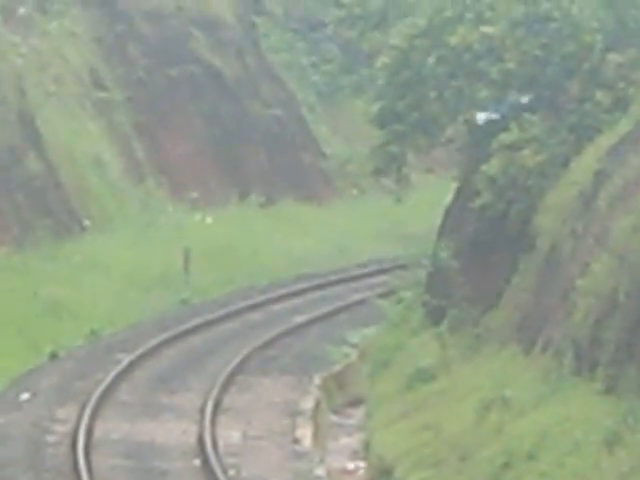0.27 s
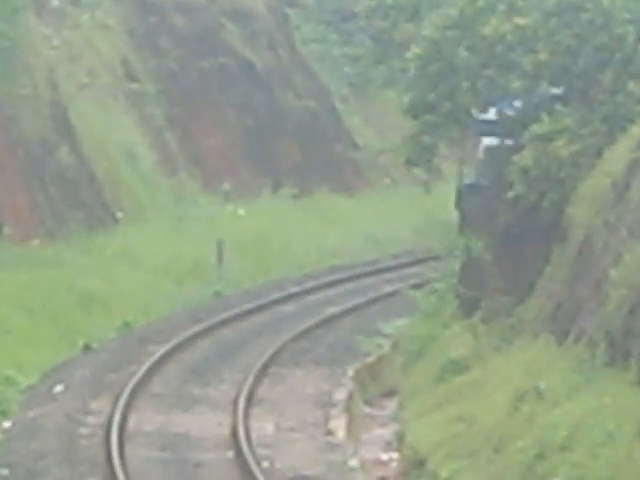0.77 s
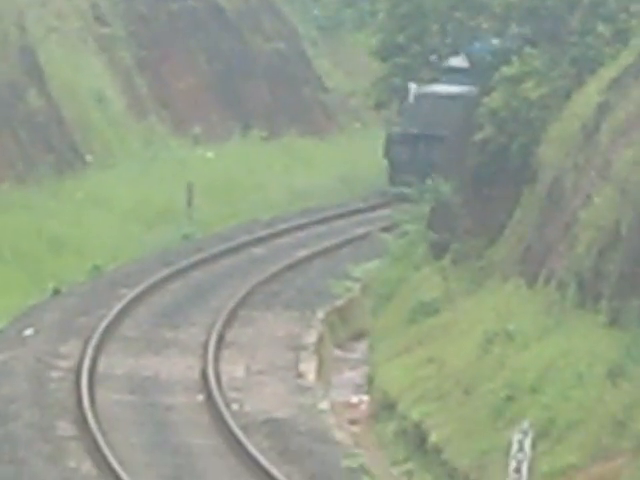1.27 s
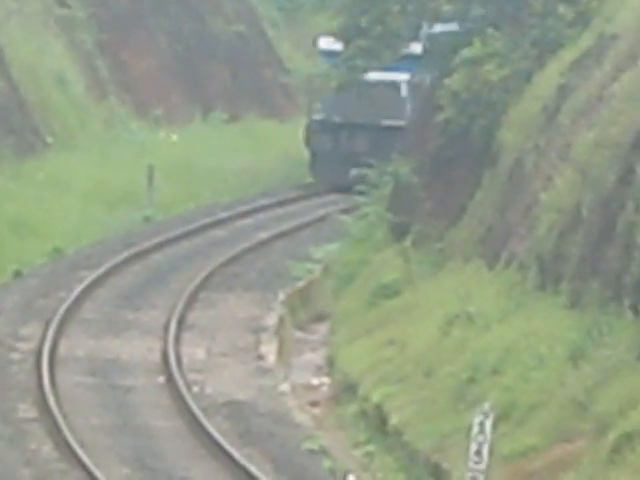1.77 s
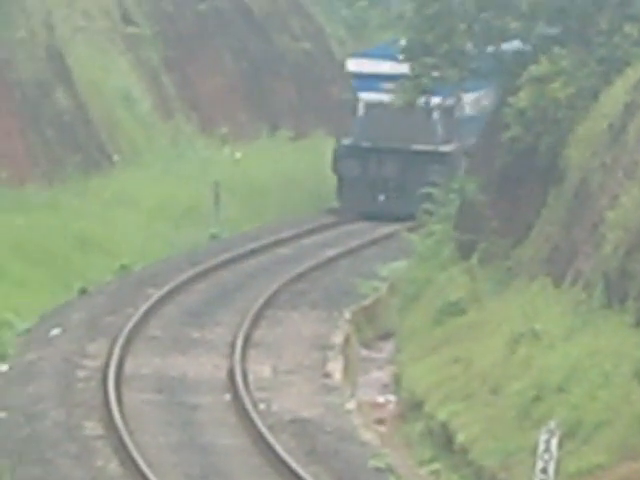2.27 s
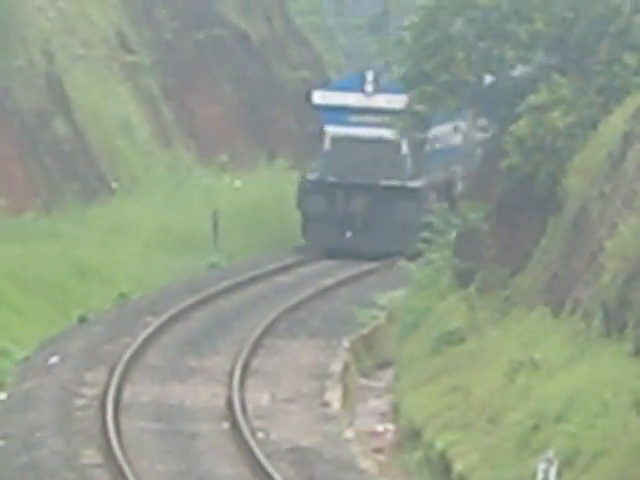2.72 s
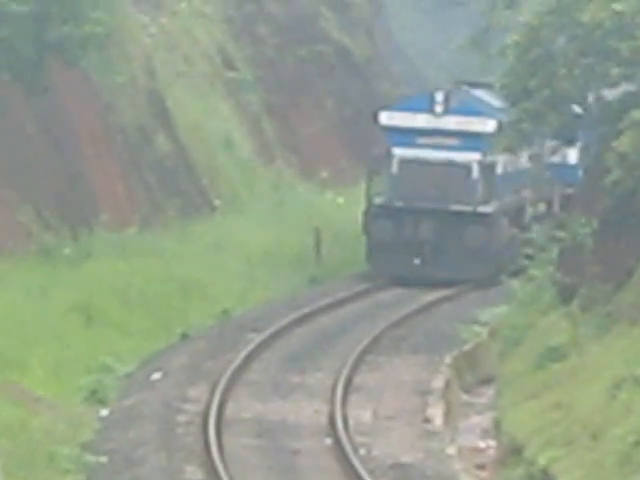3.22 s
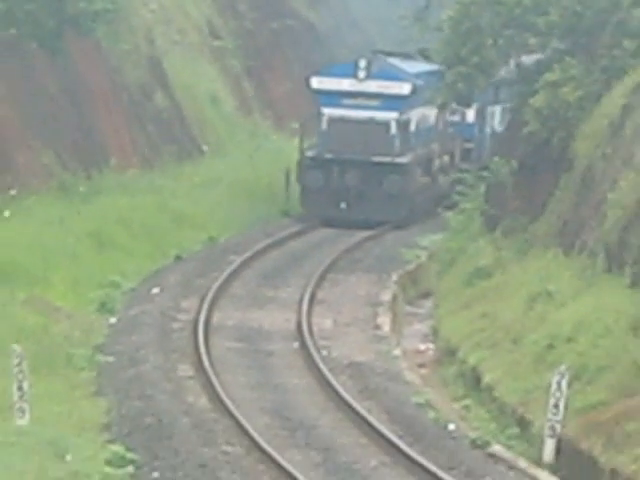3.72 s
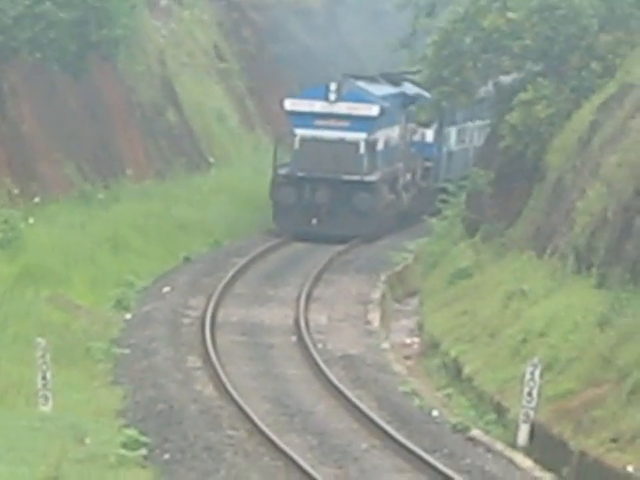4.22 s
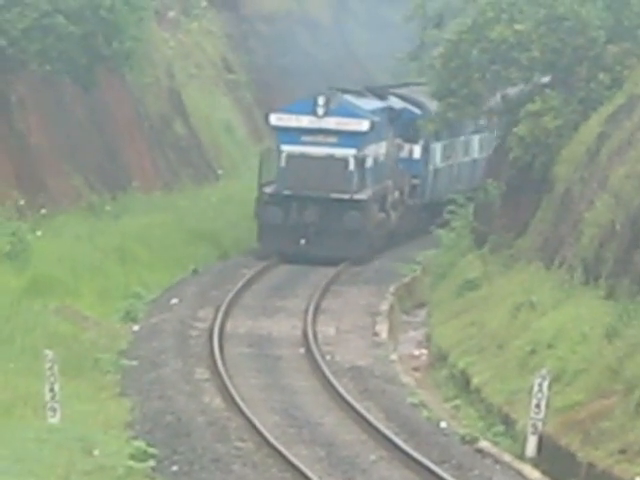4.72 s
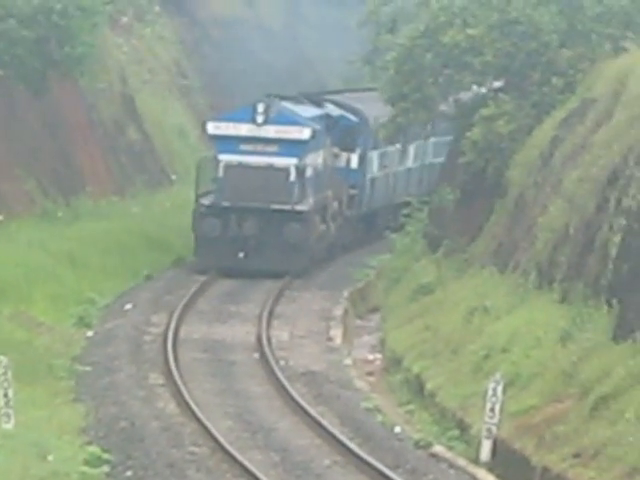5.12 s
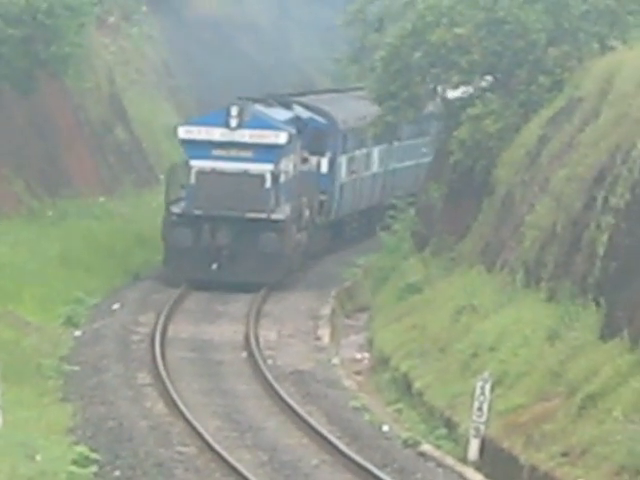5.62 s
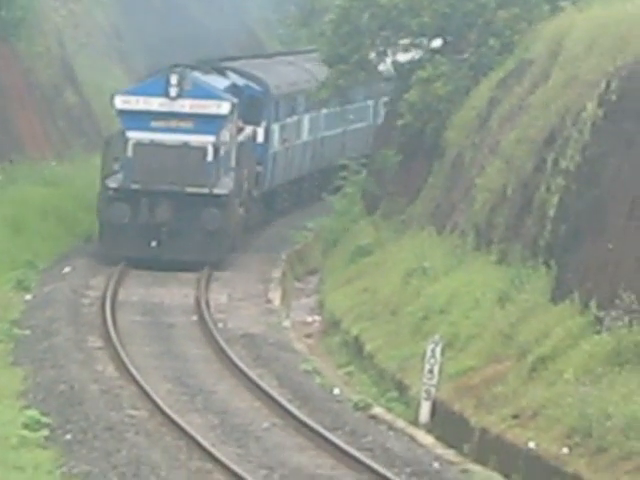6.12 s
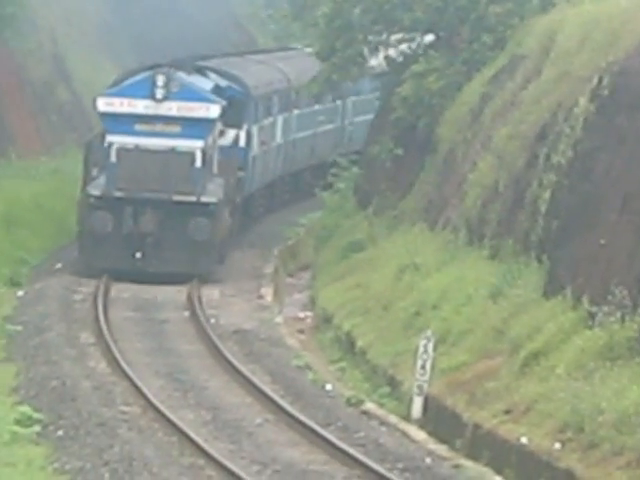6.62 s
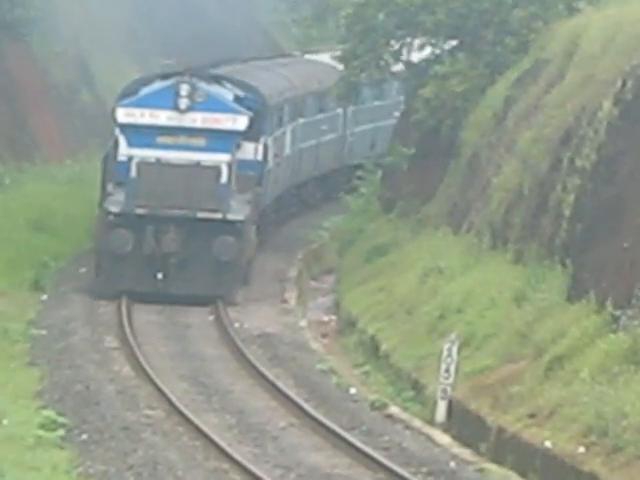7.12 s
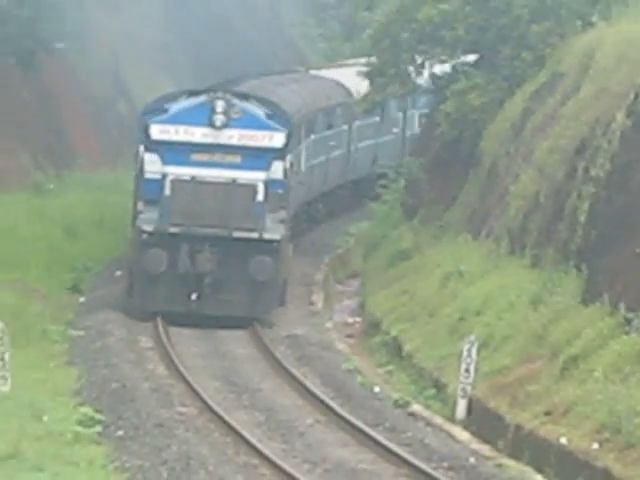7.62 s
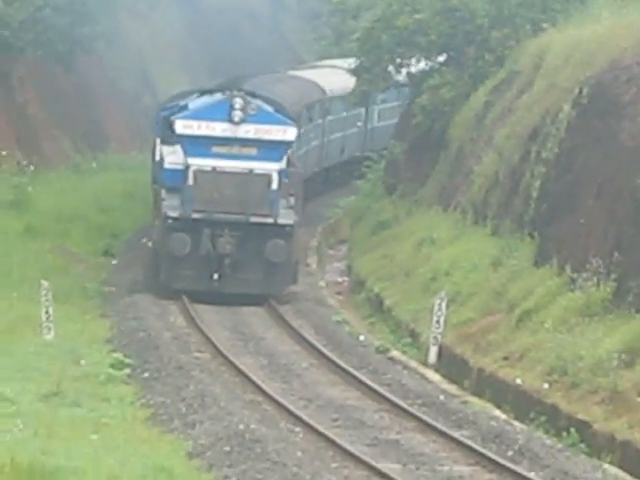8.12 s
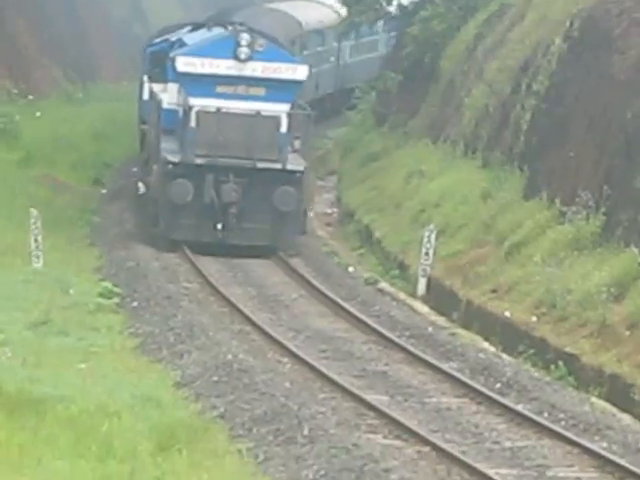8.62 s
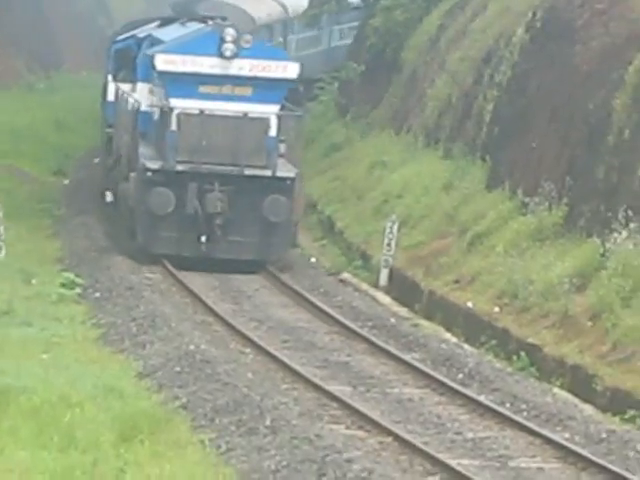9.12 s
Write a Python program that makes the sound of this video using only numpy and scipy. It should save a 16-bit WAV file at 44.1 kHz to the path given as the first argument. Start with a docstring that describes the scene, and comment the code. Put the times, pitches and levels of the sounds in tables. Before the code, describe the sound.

A small camera's microphone hears an approaching train: a deep continuous engine hum, broad roar, rushing wheels and thin fan and gear whines. A soft puff and tiny clink come early, faint whistles and short squeals around three seconds. Dry clicks near the middle and later briefly dip everything. The engine chugs more clearly in the open, then rough wind bursts cover the ending.

```python
"""Railway cutting: a two-stroke diesel locomotive draws a train toward a small camera.
Exhaust drone is lines at multiples of the crank rate; roar, rush and hiss are shaped noise;
fan, gears and traction whine as tones. A puff, a clink, thin whistles, short squeals and a late hiss pass.
Sharp ticks on the camera body make the gain control duck and creep back; late gusts buffet the microphone.
"""
import sys
import numpy as np
from scipy import signal
from scipy.fft import rfft, irfft, next_fast_len
from scipy.io import wavfile

SR = 44100
rng = np.random.default_rng(int(sys.argv[2]) if len(sys.argv) > 2 else 0)


def generate_wav(signal):
    """Clip the signal to [-1, 1] and save it as 16-bit WAV at the path in sys.argv[1]."""
    frames = np.transpose(np.atleast_2d(signal))
    scaled = np.clip(frames, -1, 1) * 32767
    pcm = np.round(scaled).astype(np.int16)
    wavfile.write(sys.argv[1], SR, pcm)


N = 413658
T = np.arange(N) / SR

# Level columns marked * : behind the bank/dB, in the open/dB, head-on/dB, all at START_M
START_M, SPEED_M_PER_S = 350, 10.15
# locomotive comes out from behind the bank: from/s, to/s
CLEARS_BANK_S = (2.9, 5.24)
# locomotive turns its nose to us: from/s, to/s
TURNS_HEAD_ON_S = (7.1, 7.97)

CRANK_HZ, FIRINGS_PER_TURN = 16.16, 8
# firing tone: *
FIRING_DB = (-28, -34, -34)
# echoes off the cutting reinforce or cancel the firing tone: t/s, half-length/s, level/dB
FIRING_SWELLS = [(0.65, 0.19, -5), (3.8, 0.33, -10.5), (4.2, 0.21, 2.5), (6.05, 0.18, 6), (6.53, 0.16, -11),
                 (7.03, 0.4, 8)]
# throb, added to the exhaust line levels: *
THROB_DB = (-1, 0.5, -2.5)
# exhaust lines: multiple of crank rate, then level/dB at each of STAGES_S
EXHAUST_LINES = [(2, -65.5, -49, -53, -65), (3, -45.5, -47, -50, -65), (4, -52, -58, -41.5, -60.5),
                 (5, -42.5, -38.5, -38, -44), (6, -59, -35, -47, -50.5), (7, -59.5, -36.5, -36.5, -37),
                 (9, -41, -38.5, -36, -40), (10, -40, -36.5, -35.5, -40), (11, -48, -56.5, -46, -50),
                 (12, -50, -44, -52, -60.5), (13, -49.5, -44.5, -48.5, -59), (14, -61.5, -67, -54, -62.5),
                 (15, -54.5, -65, -62, -73)]
# when the four line levels hold: t/s
STAGES_S = (3.499, 4.4, 6.2, 7.45)
# throb runs sharp, rolling against the firing tone: t/s, half-length/s, crank-rate shift/Hz
THROB_SHARPENING = [(4.85, .5, .282)]
# spread of the puffs: behind the bank/dB, in the open/dB
UNEVEN_PUFFS_DB = (1.1, 1.8)
# chugs that stand out or drop back: t/s, half-length/s, level/dB
CHUG_ACCENTS = [(3.045, .025, 4), (4.152, 0.027, 2.5), (4.41, .09, 1), (5.201, 0.026, 6),
                (5.324, .025, 3.5), (6.182, .025, -2), (6.726, .025, 5.5)]
# gas roar in the stack: *
GAS_DB = (-37.5, -39.5, -37)
# gas ringing in the stack: f/Hz, half-width/Hz, relative level/dB
STACK_MODE = (123, 17, 0)
# depth of gas pulsing: behind the bank, in the open [ratio]
GAS_PULSING = (.15, .45)

# rumble: *
RUMBLE_DB = (-34.5, -34.5, -34)
# rumble colour: f/Hz, relative level/dB per Hz
RUMBLE_COLOUR = [(15, -19.5), (24, -15), (35, 5.5), (50, 10), (95, 9), (125, 7), (155, 6), (175, -5.5),
                 (280, 1.5), (340, -3), (420, -1), (500, -10.5), (900, -7.5), (2000, -33.5)]
# rumble rises and sinks: t/s, half-length/s, level/dB
RUMBLE_SWELLS = [(1.55, .35, -0.5), (2.95, 0.41, 1), (6.95, 0.25, -1)]
# engine hood roar: *
HOOD_DB = (-37.5, -35.5, -36.5)
# engine hood resonances: f/Hz, half-width/Hz, relative level/dB
HOOD_MODES = [(580, 51, -8), (685, 50, -5), (747, 32, -1), (825, 43, 1.5), (877, 58, -4.5)]
# hood roar surges and dips: t/s, half-length/s, level/dB
HOOD_SURGES = [(1.15, 0.2, 3.5), (3.7, .25, -5), (4.6, .15, 0), (4.97, 0.13, 4.5), (6.65, 0.078, 2.5),
               (7.85, 0.24, 3), (8.45, .2, 1.5)]
# radiator roar: *
RADIATOR_DB = (-49.5, -42.5, -45)
# radiator resonances: f/Hz, half-width/Hz, relative level/dB
RADIATOR_MODES = [(1158, 57, -2), (1240, 91, 2), (1385, 30, -4)]
# radiator swells just before the nose hides it: t/s, half-length/s, level/dB
RADIATOR_SWELLS = [(6.8, 0.66, 3.5)]
# wheel rush: *
RUSH_DB = (-34, -32, -34.5)
# wheel rush colour: f/Hz, relative level/dB per Hz
RUSH_COLOUR = [(400, -13), (700, -3), (1050, -2.5), (1380, -1), (1580, -4.5), (1820, 1), (2060, -3.5),
               (2400, 1.5), (2900, -1.5), (3250, -4), (3500, -3.5), (3800, -6), (5000, -19.5),
               (7000, -42.5)]
# high hiss: *
HISS_DB = (-42.5, -38.5, -37)
# hiss colour: f/Hz, relative level/dB per Hz
HISS_COLOUR = [(2000, -25), (3300, -13.5), (4000, -2), (4800, -1), (5300, -5), (6100, -11), (6600, -20.5),
               (7200, -28)]
# treble rises early, dips twice later: t/s, half-length/s, level/dB
TREBLE_SWELLS = [(0.9, 0.24, 2.5), (1.65, 0.6, 3.5), (3.78, 0.18, -4.5), (6.35, 0.47, -0.5)]
RUSH_SHARE = 0.97   # part of the treble swells/dB that the rush follows

# cooling-fan pitch: t/s, f/Hz
FAN_PITCH = [(0, 294.7), (3.3, 294.7), (4.9, 297.9), (7.2, 295.9), (8.4, 294)]
# blade harmonics: multiple, *
BLADE_LINES = [(1, -46.5, -48.5, -51), (2, -49.5, -48.5, -56), (3, -47.5, -44.5, -43.5)]
# one blade harmonic sings out: multiple, t/s, half-length/s, level/dB
FAN_SWELLS = [(2, 5.8, 0.43, 8.5), (3, 1, 0.28, 7), (3, 4.1, 0.2, 4.5), (3, 5.0, 0.13, 10.5),
              (3, 4.9, 0.14, 7.5), (3, 8.5, .16, 2)]
# steady gear-train whines: f/Hz, *
GEAR_TRAIN = [(692, -52.5, -51.5, -61.5), (766, -46.5, -52, -49.5), (833, -48, -50.5, -47),
              (1192, -55.5, -54, -54.5), (1245, -61, -54.5, -53), (1292, -53, -48, -48)]
# one gear whine swells: nearby f/Hz, t/s, half-length/s, level/dB
GEAR_SWELLS = [(762, 0.47, .2, 5), (762, 4.0, .17, 17), (762, 5.4, .09, 13), (762, 7.9, .12, 7),
               (827, 6.1, 0.1, 7), (827, 5.72, .09, 10), (1274, 6.7, .4, 5.5)]
# traction gears: *
TRACTION_DB = (-50.5, -46, -53.5)
TRACTION_START_HZ, TRACTION_RISE_HZ_PER_S = 404.7, 3.2
# thin turbocharger whistles: f/Hz, half-width/Hz, level behind the bank/dB
TURBO_WHISTLES = [(3077, 4, -51), (3020, 13, -56.5), (3457, 47, -49.5), (3610, 30, -54.5)]

# soft early puff of air: t/s, half-length/s, level/dB, f/Hz, half-width/Hz
PUFFS = [(0.622, 0.065, -28, 48.6, 22.3)]
CLINK_S = 0.905
# modes of the clinking steel: f/Hz, level/dB, decay/s
CLINK_MODES = [(4400, -32.5, 0.0072), (4720, -30, .013), (6300, -44, .008)]
# thin high whistles (first three rows), two short squeals, one late broad swell of hiss:
# t/s, half-length/s, level/dB, f/Hz, half-width/Hz
HIGH_SWELLS = [(2.5, 0.36, -48.5, 3112, 8), (2.68, .26, -47, 3622, 7.5), (2.65, .3, -56, 3784, 9),
               (3.08, 0.05, -37.5, 3110, 64), (3.39, .03, -36, 3200, 129), (8.2, .55, -40.5, 3230, 350)]
# ticks on the camera body: t/s, ring level/dB, ring f/Hz, ring decay/s,
# knock level/dB, knock f/Hz, knock decay/s, snap level/dB
TICKS = [(3.323, -11.5, 4240, 0.0022, -8, 750, .001, 4.5),
         (3.6084, -22.5, 3680, 0.0012, -24, 450, .006, -30), (3.609, -19, 5370, 0.0012, -26, 780, .002, -7),
         (3.611, -25, 4500, 0.0009, -18.5, 1000, .0025, -30),
         (7.5177, -17.5, 4050, 0.0019, -23, 750, .001, 3), (7.958, -20, 2490, .001, -25, 750, .001, -9.5)]

# gusts on the microphone: start t/s, length/s, force/dB
GUSTS = [(8.517, 0.024, -28), (8.652, 0.019, -29), (8.685, 0.031, -20), (8.744, 0.042, -16),
         (8.81, .02, -23.5), (8.857, 0.037, -20.5), (8.937, 0.046, -21.5), (8.996, 0.16, -24.5),
         (9.168, .075, -18.5), (9.247, 0.05, -15.5), (9.31, .07, -27)]
GUST_ATTACK_S, GUST_RELEASE_S = 0.011, 0.016
# breeze carrying the gusts: t/s, half-length/s, force/dB
BREEZE = (8.92, 0.25, -26.5)
# buffeting colour: f/Hz, relative level/dB per Hz
BUFFET_COLOUR = [(25, -32.5), (70, 3.5), (150, 1), (230, 1), (320, -4.5), (500, -10.5), (800, -12.5),
                 (1200, -16), (2000, -43.5), (4000, -41)]
# air tearing at the port: f/Hz, half-width/Hz, relative level/dB
TEARING_MODES = [(420, 130, 3.5), (900, 390, -10.5)]
TEARING_DB = 10.5   # on top of force squared
# biggest eddies thump the diaphragm: t/s, peak level/dB
THUMPS = [(8.690, -6.5), (8.703, -6), (8.736, -8), (8.760, -7), (8.872, -13), (9.112, -12), (9.186, -9),
          (9.262, -8), (9.297, -12.5)]
THUMP_S = 0.0013

STOPBAND_HZ = 7550


def from_db(db):
    """Decibels to gain."""
    return 10 ** (np.asarray(db) / 20)


def rms_one(x):
    """Scale to unit power."""
    return x / np.sqrt(np.mean(x ** 2) + 1e-20)


def drift(rate_hz):
    """Slow random wander of spread 1, changing about rate_hz times a second."""
    step = 100   # samples between drawn points
    r = np.exp(-2 * np.pi * rate_hz * step / SR)
    white = rng.standard_normal(N // step + 2002)
    slow = signal.lfilter([1], [1, -2 * r, r * r], white)[2000:]   # drop the settling
    return np.interp(np.arange(N) / step, np.arange(len(slow)), rms_one(slow))


def noise(gain_at):
    """Unit-power noise whose gain is a function of frequency."""
    size = next_fast_len(N)
    hz = np.maximum(np.fft.rfftfreq(size, 1 / SR), 1)
    spectrum = rfft(rng.standard_normal(size)) * gain_at(hz)
    return rms_one(irfft(spectrum, size)[:N])


def coloured(points):
    """Unit-power noise: colour interpolated over log frequency, rolled off around its last point."""
    hz, db = np.transpose(points)

    def gain_at(f):
        return from_db(np.interp(np.log(f), np.log(hz), db)) / (1 + (f / hz[-1]) ** 4)
    return noise(gain_at)


def resonant(modes):
    """Unit-power noise in resonances whose powers add; gain halves at half_width_hz off centre."""
    def gain_at(f):
        power = 0
        for hz, half_width_hz, db in modes:
            power = power + (from_db(db) / (1 + ((f - hz) / half_width_hz) ** 2)) ** 2
        return np.sqrt(power)
    return noise(gain_at)


def tone(turns):
    """Unit-power sinusoid."""
    return np.sqrt(2) * np.cos(2 * np.pi * turns)


def scattered(turns, scatter, rate_hz):
    """Tone joined by its shifting echoes from the cutting walls."""
    in_phase = drift(rate_hz) * np.cos(2 * np.pi * turns)
    quadrature = drift(rate_hz) * np.sin(2 * np.pi * turns)
    return (tone(turns) + scatter * (in_phase + quadrature)) / np.sqrt(1 + scatter ** 2)


def bell(middle_s, half_s):
    """Gaussian rise and fall, 1/e at half_s from the middle."""
    return np.exp(-((T - middle_s) / half_s) ** 2)


def bumps(rows):
    """Sum of smooth passing rises and dips, in the unit of the last column."""
    return sum(height * bell(s, half_s) for s, half_s, height in rows)


def swells(rows):
    """Brief swells of noise, each in one resonance."""
    out = 0
    for s, half_s, db, hz, half_width_hz in rows:
        out = out + from_db(db) * bell(s, half_s) * resonant([(hz, half_width_hz, 0)])
    return out


def approach(levels_db):
    """Source level/dB: interpolated between aspects, growing as 1 / distance."""
    hidden_db, open_db, head_on_db = levels_db
    times_s = [*CLEARS_BANK_S, *TURNS_HEAD_ON_S]
    aspect_db = np.interp(T, times_s, [hidden_db, open_db, open_db, head_on_db])
    return aspect_db - 20 * np.log10(1 - SPEED_M_PER_S * T / START_M)


def exhaust_throb(beat, stack_hz=125, stack_width_hz=55, smear_turns=0.095):
    """Uneven puffing once a turn: lines delayed by stack resonance, smeared by reflections."""
    throb = 0
    for order, *levels_db in EXHAUST_LINES:
        stack_lag = np.arctan(2 * (order * CRANK_HZ - stack_hz) / stack_width_hz) / (2 * np.pi)
        lag_turns = stack_lag + smear_turns * drift(0.3)
        line = scattered(order * beat - lag_turns, scatter=0.44, rate_hz=0.82)
        throb = throb + from_db(np.interp(T, STAGES_S, levels_db)) * line
    puffs_db = np.interp(T, CLEARS_BANK_S, UNEVEN_PUFFS_DB) * drift(10) + bumps(CHUG_ACCENTS)
    return from_db(approach(THROB_DB) + puffs_db) * throb


def exhaust(crank):
    """Firing tone and throb; gas roars in the stack, pulsing once a turn."""
    beat = crank + np.cumsum(bumps(THROB_SHARPENING)) / SR
    firing = scattered(FIRINGS_PER_TURN * crank, scatter=0.15, rate_hz=3.2)
    firing = from_db(approach(FIRING_DB) + bumps(FIRING_SWELLS)) * firing
    pulsing = 1 + np.interp(T, CLEARS_BANK_S, GAS_PULSING) * np.cos(2 * np.pi * beat)
    gas = from_db(approach(GAS_DB)) * pulsing * resonant([STACK_MODE])
    return firing + exhaust_throb(beat) + gas


def rumble():
    """Low coloured noise with a wandering level."""
    level_db = approach(RUMBLE_DB) + bumps(RUMBLE_SWELLS) + 0.9 * drift(3.1)
    return from_db(level_db) * coloured(RUMBLE_COLOUR)


def hood_roar(crank):
    """Noise in the hood resonances, pulsing with the firings and each turn."""
    pulsing = 1 + 0.069 * tone(FIRINGS_PER_TURN * crank) + 0.025 * tone(crank)
    level_db = approach(HOOD_DB) + bumps(HOOD_SURGES) + 0.56 * drift(14.0)
    return from_db(level_db) * resonant(HOOD_MODES) * pulsing


def radiator_roar():
    """Fluttering noise in the radiator resonances."""
    level_db = approach(RADIATOR_DB) + bumps(RADIATOR_SWELLS) + 2.1 * drift(18.0)
    return from_db(level_db) * resonant(RADIATOR_MODES)


def rush_and_hiss():
    """Wheel rush and high hiss: coloured noises sharing treble swells and flutter."""
    air_db = 0.45 * drift(6.2)   # turbulent air makes distant sound flutter
    treble_db = bumps(TREBLE_SWELLS)
    rush_db = approach(RUSH_DB) + RUSH_SHARE * treble_db + air_db
    hiss_db = approach(HISS_DB) + treble_db + air_db + 0.9 * drift(36.0)
    return from_db(rush_db) * coloured(RUSH_COLOUR) + from_db(hiss_db) * coloured(HISS_COLOUR)


def cooling_fan():
    """Blade-passing harmonics with slightly wandering pitch."""
    blade_hz = np.interp(T, *np.transpose(FAN_PITCH)) * (1 + 0.00095 * drift(1.28))
    blades = np.cumsum(blade_hz) / SR
    out = 0
    for k, *levels_db in BLADE_LINES:
        swell_db = bumps([row for multiple, *row in FAN_SWELLS if multiple == k])
        harmonic = scattered(k * blades, scatter=0.58, rate_hz=5.0)
        out = out + from_db(approach(levels_db) + swell_db) * harmonic
    return out


def gear_train():
    """Fixed-pitch engine gear whines; some swell as their echoes line up."""
    out = 0
    for hz, *levels_db in GEAR_TRAIN:
        swell_db = bumps([row for near_hz, *row in GEAR_SWELLS if abs(near_hz - hz) < 20])
        whine = scattered(hz * T, scatter=0.7, rate_hz=3.8)
        out = out + from_db(approach(levels_db) + swell_db) * whine
    return out


def traction_gears():
    """Tooth-contact whine climbing steadily in pitch, strongly scattered."""
    teeth = np.cumsum(TRACTION_START_HZ + TRACTION_RISE_HZ_PER_S * T) / SR
    return from_db(approach(TRACTION_DB)) * scattered(teeth, scatter=2.6, rate_hz=9.5)


def turbo_whistles():
    """Narrow noise bands, wavering, that fade 7 dB as the locomotive clears the bank."""
    out = 0
    for hz, half_width_hz, db in TURBO_WHISTLES:
        out = out + from_db(db + 2.0 * drift(4.6)) * resonant([(hz, half_width_hz, 0)])
    return out * from_db(np.interp(T, CLEARS_BANK_S, [0, -7.0]))


def air_puff():
    """Soft low rumble of air on the microphone."""
    return swells(PUFFS)


def clink():
    """Small, distant clink of steel: decaying modes."""
    t = np.maximum(T - CLINK_S, 0)
    return sum(from_db(db) * np.sin(2 * np.pi * hz * t) * np.exp(-t / decay_s)
               for hz, db, decay_s in CLINK_MODES)


def high_swells():
    """Bands of noise swell and fade: thin whistles, then short squeals, late a broad hiss."""
    return swells(HIGH_SWELLS)


def ticks(snap_s=0.00066, crack_db=-2, crack_decay_s=0.0011, upper_ratio=1.1):
    """A tick rings the small plastic case: dry crack, low knock, two bright modes, very high snap."""
    out, t = np.zeros(N), np.arange(SR // 50) / SR
    # at SR / 4, above the output band, yet it drives the gain control
    snap = np.sin(2 * np.pi * t * SR / 4) * np.exp(-(3 * (t / snap_s - 1)) ** 2)
    lowpass = signal.butter(6, 5600, fs=SR, output="sos")
    cracks = signal.sosfilt(lowpass, 2 * rng.standard_normal((len(TICKS), len(t))))
    for row, crack in zip(TICKS, cracks):
        s, ring_db, ring_hz, decay_s, knock_db, knock_hz, knock_decay_s, snap_db = row
        knock = np.sin(2 * np.pi * knock_hz * t) * np.exp(-t / knock_decay_s)
        modes = np.sin(2 * np.pi * ring_hz * t) - 0.5 * np.sin(2 * np.pi * upper_ratio * ring_hz * t)
        case = modes * np.exp(-t / decay_s)
        case = case + from_db(crack_db) * crack * np.exp(-t / crack_decay_s)
        tick = from_db(ring_db) * case - from_db(knock_db) * knock + from_db(snap_db) * snap
        start = round(s * SR)
        out[start:start + len(t)] += tick
    return out


def wind_force():
    """Gusts build, hold and die on a breeze; the strongest prevails."""
    middle_s, half_s, breeze_db = BREEZE
    force = from_db(breeze_db) * bell(middle_s, half_s)
    for s, length_s, db in GUSTS:
        before = np.maximum(s - T, 0) / GUST_ATTACK_S
        after = np.maximum(T - s - length_s, 0) / GUST_RELEASE_S
        force = np.maximum(force, from_db(db) * np.exp(-before - after))
    return force


def wind():
    """Buffeting follows force, tearing its square; biggest eddies thump the diaphragm."""
    force = wind_force()
    lumps_db = 2.0 * drift(70.0)
    tearing = from_db(TEARING_DB) * force ** 2 * resonant(TEARING_MODES)
    eddies = force * coloured(BUFFET_COLOUR) + tearing
    thumps = 0
    for s, db in THUMPS:
        away = ((T - s) / THUMP_S) ** 2
        thumps = thumps - from_db(db) * (1 - away) * np.exp(-away / 2)
    return from_db(lumps_db) * eddies + thumps


def scene():
    """Train on a nearly steady crank; puff, ticks and wind arise at the camera."""
    crank = np.cumsum(CRANK_HZ * (1 + 0.001 * drift(0.85))) / SR
    engine = exhaust(crank) + rumble() + hood_roar(crank) + radiator_roar()
    whines = cooling_fan() + gear_train() + traction_gears() + turbo_whistles()
    train = engine + rush_and_hiss() + whines + clink()
    at_camera = air_puff() + ticks() + wind()
    return (train + high_swells() + at_camera)[None]


def gain_control(x, ceiling_db, release_db_per_s, attack_s):
    """Any peak over the ceiling pulls the gain down quickly; it then creeps back."""
    over_db = np.maximum(20 * np.log10(np.abs(x) + 1e-9) - ceiling_db, 0)
    released_db = release_db_per_s * T
    cut_db = np.maximum.accumulate(over_db + released_db, axis=-1) - released_db
    r = np.exp(-1 / (attack_s * SR))
    return x * from_db(-signal.lfilter([1 - r], [1, -r], cut_db))


def record(dry):
    """Small camera: gain control, then a steep low-pass, 70 dB down at STOPBAND_HZ."""
    held = gain_control(dry, ceiling_db=-12.0, release_db_per_s=49.0, attack_s=0.00037)
    lowpass = signal.cheby2(20, 70, STOPBAND_HZ, fs=SR, output="sos")
    return signal.sosfilt(lowpass, held)


dry = scene()
out = record(dry)
generate_wav(out)
```